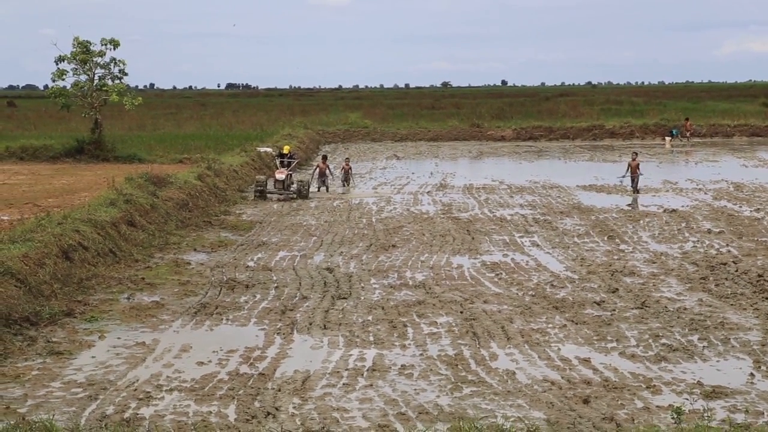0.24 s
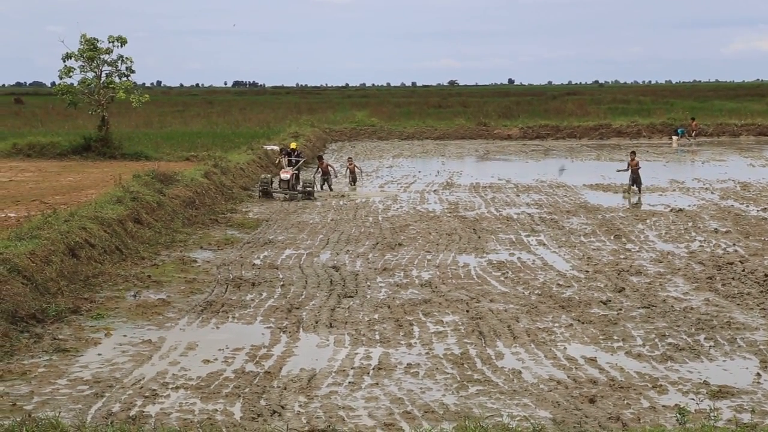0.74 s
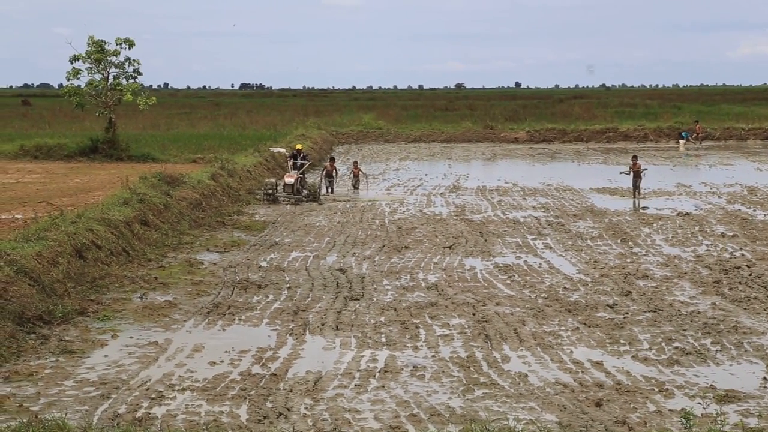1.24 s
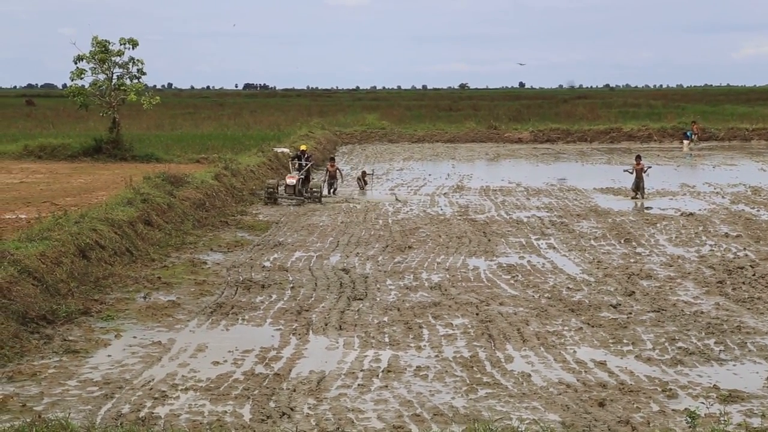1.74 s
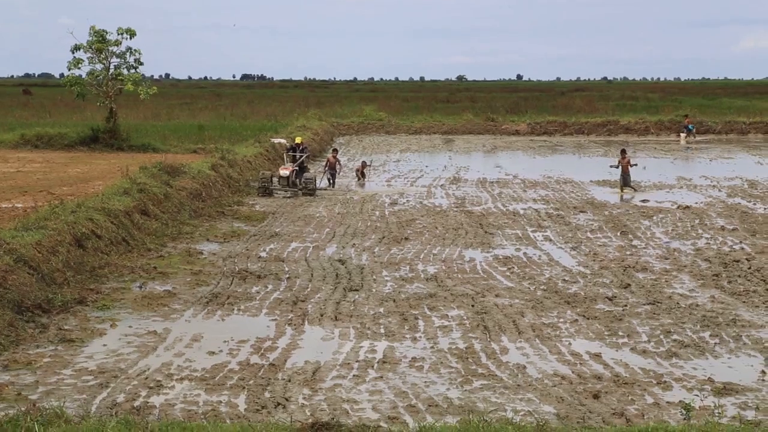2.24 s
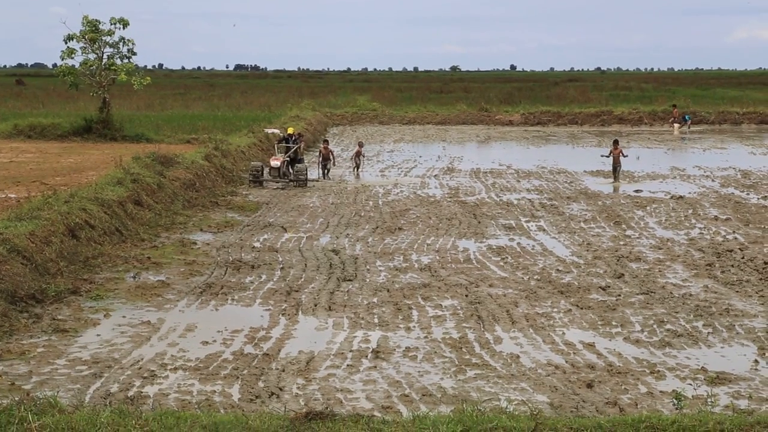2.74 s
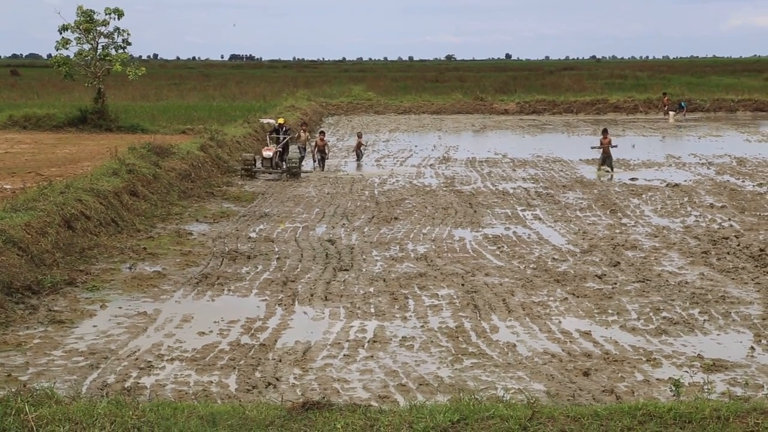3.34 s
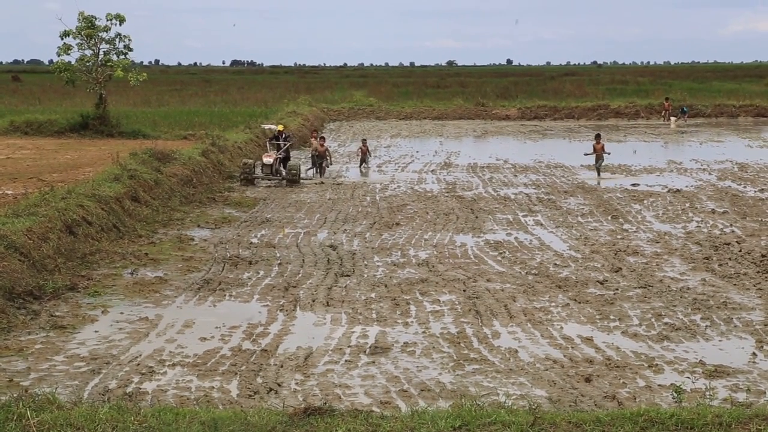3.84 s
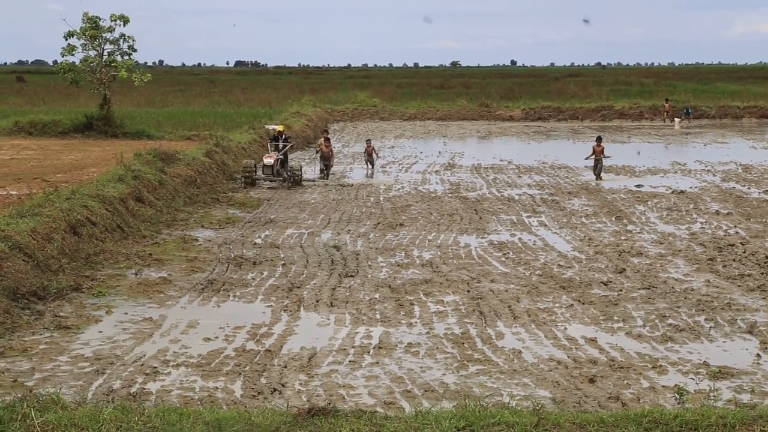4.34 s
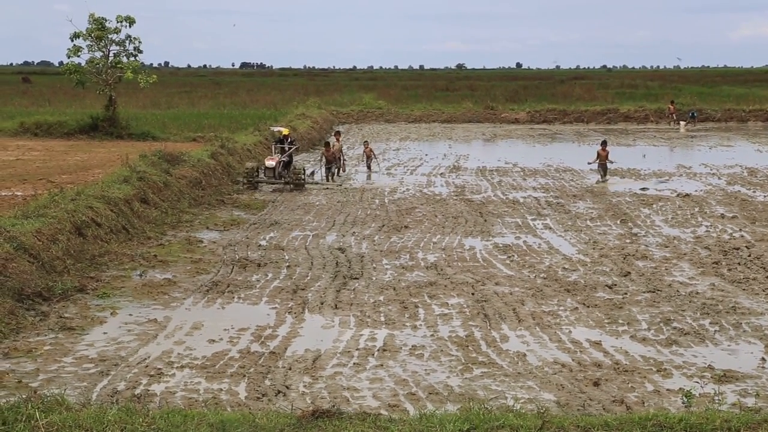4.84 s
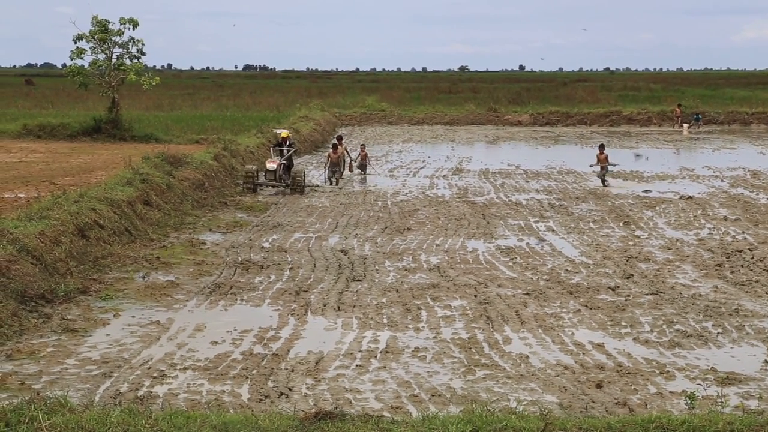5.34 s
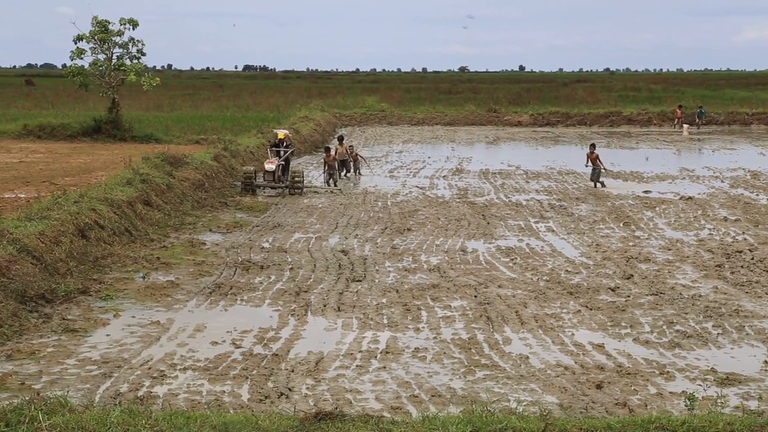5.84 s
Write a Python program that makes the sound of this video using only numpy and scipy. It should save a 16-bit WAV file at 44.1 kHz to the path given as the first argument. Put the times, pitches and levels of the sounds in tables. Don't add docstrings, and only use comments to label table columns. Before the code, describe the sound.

Fast, even putt-putt of a small diesel engine far off over mud and water, repeatedly buried under heavy low wind buffeting on the microphone.

```python
import sys
import numpy as np
from scipy import signal
from scipy.fft import rfft, irfft, next_fast_len
from scipy.io import wavfile
from scipy.ndimage import uniform_filter1d, minimum_filter1d, map_coordinates

SR = 44100
rng = np.random.default_rng(int(sys.argv[2]) if len(sys.argv) > 2 else 0)


def attenuation_scalar(level_db):
    decades = np.asarray(level_db, float) / 20
    return 10 ** decades


def transcribe(u):
    v = np.clip(np.atleast_2d(u).T, -1, 1)
    q = np.round(v * 32767).astype(np.int16)
    wavfile.write(sys.argv[1], SR, q)


N = 269010

# [f/Hz, width/Hz, level/dB]
BLOCK_MODES = [(1300, 2000, -9), (2710, 184, 5), (2900, 74, 7), (3222, 128, 6), (4280, 640, -6)]
# [f/Hz, level/dB per Hz]
BLOCK_TREBLE = [(4000, -2.5), (5500, 0), (6500, -2.5), (8500, -4.5), (9600, -0.5), (10500, -5.5),
                (12000, -9.5), (13000, -26), (15500, -34)]
# [t/s, whine level/dB, engine drone level/dB]
WHINE_DRONE_LEVELS = [(0, -52, -44.5), (.71, -49, -43.5), (1.45, -50, -45.5), (1.67, -52, -46.5), (1.89, -53, -44),
                      (2.11, -51, -42), (2.6, -53, -42.5), (3.39, -49, -42), (3.59, -48, -42), (3.93, -48, -42.5),
                      (4.3, -51, -44), (4.46, -50, -42.5), (4.7, -48, -40.5), (5.1, -49, -42), (5.45, -49, -43),
                      (5.6, -51, -45), (5.92, -50, -43), (6.06, -53, -46.5)]


def unit(x):
    return x / np.sqrt(np.mean(x ** 2) + 1e-20)


def curves(rows):
    s, *cols = np.transpose(rows)
    return [np.interp(np.arange(N) / SR, s, c) for c in cols]


def wobble(rate):
    knots = rng.standard_normal(int(N * rate / SR) + 4)
    return map_coordinates(knots, [np.arange(N) * rate / SR])


def filtered(x, response):
    m = next_fast_len(x.shape[-1] + 8192)
    return irfft(rfft(x, m) * response(np.fft.rfftfreq(m, 1 / SR)), m)[..., :x.shape[-1]]


def colour(points):
    f, db = np.transpose(points)
    return lambda hz: attenuation_scalar(np.interp(np.log(hz + 1), np.log(f), db))


def modes(table):
    def response(f):
        return sum((-1) ** k * attenuation_scalar(db) * 1j * f * width / (hz * hz - f * f + 1j * f * width)
                   for k, (hz, width, db) in enumerate(table))
    return response


def decay(t, t60):
    return attenuation_scalar(-60 * t / t60)


def bell(x):
    return np.exp(-.5 * x ** 2)


def lay(times, shapes, lead):
    start = np.round((np.asarray(times) - lead) * SR).astype(int)
    at = start[:, None] + np.arange(shapes.shape[1])
    keep = (at >= 0) & (at < N)
    return np.bincount(at[keep], shapes[keep], N)


def bursts(times, db, envelope, response, lead, grit_db=2.5, alike=0):
    white = rng.standard_normal((2, len(times), len(envelope)))
    white = np.sqrt(1 - alike) * white + np.sqrt(alike) * white[:, :1]
    ring = filtered(white[0] * attenuation_scalar(grit_db * white[1]) * envelope, response)
    ring = ring / np.sqrt(np.sum(ring ** 2, 1, keepdims=True) / np.sum(envelope ** 2))
    return lay(times, attenuation_scalar(db)[:, None] * ring, lead)


def rush(spectrum, patchy_db):
    z = signal.stft(rng.standard_normal(N + 512), nperseg=512)[2]
    field = uniform_filter1d(rng.standard_normal(z.shape), size=5, axis=0)
    field = uniform_filter1d(field, size=6, axis=1)
    patchy = signal.istft(z * attenuation_scalar(patchy_db * unit(field)), nperseg=512)[1][:N]
    return unit(filtered(patchy, colour(spectrum)))


def engine():
    s, clack_db, treble_db, puff_db = firings()
    sound = clack(s, clack_db, treble_db) + exhaust(s, puff_db) + thump(s, puff_db)
    return sound + drone(s) + valves(s, puff_db)


def firings():
    # [t/s, knock level/dB, brightness of the knock/dB]
    fourths = [(.0008, -28.5, -10), (0.46, -29.5, -7), (0.9225, -31, -3), (1.3852, -34, 1.5),
               (1.8488, -30, -11), (2.312, -28, -8), (2.776, -27, -5), (3.238, -28, -11), (3.7, -28, -6.5),
               (4.159, -29.5, -9.5), (4.6244, -27, -9.5), (5.0912, -28, -13), (5.5563, -29.5, -15),
               (6.012, -30.5, -11)]
    # [t/s, extra level/dB]
    accents = [(0, -10.5), (.69, 1.5), (.81, -2), (1.15, 1.5), (1.62, 1), (1.96, 3.5), (2.08, 3),
               (3.12, 2.5), (3.24, -2), (3.81, 1.5), (3.93, 1), (4.97, 1.5), (5.32, 1.5), (2.31, 3.5),
               (2.54, 3.5), (2.66, -3), (2.89, 4), (3.01, 2), (3.35, 0), (3.7, 2), (4.27, -4.5),
               (4.74, 1.5), (4.86, 3), (5.21, 2), (5.67, -1.5), (5.78, 1.5), (6.01, -4)]
    step = np.arange(4 * len(fourths) - 3) / 4
    s, knock_db, bright_db = (np.interp(step, np.arange(len(fourths)), c) for c in np.transpose(fourths))
    for at, db in accents:
        extra_db = db * (np.arange(len(s)) == np.argmin(abs(s - at)))
        knock_db = knock_db + extra_db
        bright_db = bright_db - .6 * extra_db
    drone_s, _, drone_db = np.transpose(WHINE_DRONE_LEVELS)
    mean_db = drone_db.mean()
    puff_db = mean_db + 12 + 0.53 * (np.interp(s, drone_s, drone_db) - mean_db)
    luck = rng.standard_normal((len(s), 3))
    return s, knock_db + .7 * luck[:, 0], bright_db + 1.2 * luck[:, 1], puff_db + 1.5 * luck[:, 2]


def clack(s, clack_db, treble_db):
    t = np.arange(SR // 10) / SR
    blow = bell((t - .006) / 0.0021) + attenuation_scalar(-2.5 - 60 * t / 0.086) * (t > .006)
    snap = bell((t - .005) / np.where(t < .005, .0014, .0027))
    body = bursts(s, clack_db - 2.0, blow, modes(BLOCK_MODES), lead=.0078)
    return body + bursts(s, clack_db + treble_db, snap, colour(BLOCK_TREBLE), lead=0.0049)


def exhaust(s, puff_db):
    # [f/Hz, width/Hz, level/dB]
    pipe = [(660, 16, 5.5), (951, 34.5, 7.5), (1250, 320, -2), (1484, 220, 2.5), (2000, 220, -1),
            (2900, 510, -2), (5800, 5800, -19), (9000, 3400, -17.5)]
    # [f/Hz, level/dB]
    muffle = [(100, -4.5), (2200, 1.5), (2400, -6.5), (11000, -4.5), (15000, -18)]
    # [f/Hz, level/dB, t60/s]
    shell = [(604, 5, 0.027), (693.5, -11, 0.28), (961, -2, 0.045), (1455, -7, 0.03)]
    s, puff_db = np.append(s, 2 * s[-1] - s[-2]), np.append(puff_db, puff_db[-1])
    t = np.arange(SR // 10) / SR
    hold_s = 0.0056
    gas = (1 - np.exp(-t / 0.00035)) * decay(np.maximum(t - hold_s, 0), 0.096)
    gas += 0.075 * bell((t - .008) / 0.00086)
    puff = bursts(s, puff_db, gas, lambda f: modes(pipe)(f) * colour(muffle)(f),
                  lead=.0315, grit_db=4.0, alike=.08)
    ring = sum(attenuation_scalar(db - 60 * t / t60) * np.sin(2 * np.pi * hz * t) for hz, db, t60 in shell)
    ring = ring * (1 - np.exp(-t / 0.0022))
    return puff + lay(s, attenuation_scalar(puff_db)[:, None] * ring, lead=.033)


def thump(s, puff_db):
    t = np.arange(SR // 10) / SR
    thud = np.cos(2 * np.pi * 67 * (t - .006)) * (1 - np.exp(-t / 0.0046)) * decay(t, 0.22)
    return lay(s, attenuation_scalar(puff_db + 8.5)[:, None] * thud, lead=0.0082)


def drone(s):
    # [f/Hz, level/dB per Hz]
    gears = [(250, -7), (420, -7.5), (560, -10), (696, 1.5), (835, -19), (953, -5), (1120, -9.5),
             (1460, -11), (2280, -16.5), (2800, -15), (3230, -22), (3600, -20), (4600, -28.5), (7000, -61)]
    t = np.arange(SR // 10) / SR
    beat = lay(s, np.ones((len(s), 1)) * decay(t, 0.079), lead=0)
    level_db = curves(WHINE_DRONE_LEVELS)[1] + 4.5 + 5.9 * beat + 1.1 * wobble(60) + 1.46 * wobble(350)
    return attenuation_scalar(level_db) * rush(gears, patchy_db=0.5)


def valves(s, puff_db):
    # [t from the knock/s, level against the exhaust puff/dB]
    gear = [
        (-.031, -19),
        (.025, -18.5),
        (.058, -14),
    ]
    t = np.arange(SR // 50) / SR
    luck = rng.standard_normal((len(s), 2, len(gear)))
    tick = (1 - np.exp(-t / 0.0013)) * decay(t, 0.025)
    body = lambda f: colour(BLOCK_TREBLE)(f) + attenuation_scalar(-19.0) * modes(BLOCK_MODES)(f)
    out = np.zeros(N)
    for k, (at, db) in enumerate(gear):
        tick_s = s + at + .001 * luck[:, 0, k]
        out += bursts(tick_s, puff_db + db + 2 * luck[:, 1, k], tick, body, lead=0)
    return out


def ticks():
    chance = rng.random((260, 2))
    s = chance[:, 0] * N / SR
    drone_db = np.interp(s, np.arange(N) / SR, curves(WHINE_DRONE_LEVELS)[1])
    db = drone_db - 3 - 4.3 * np.log(chance[:, 1] + 0.05)
    t = np.arange(SR // 50) / SR
    body = lambda f: modes(BLOCK_MODES)(f) + attenuation_scalar(-21.0) * colour(BLOCK_TREBLE)(f)
    return bursts(s, db, decay(t, 0.0083), body, lead=0)


def rattles():
    # [t/s, peak level/dB, f/Hz]
    knocks = [(0.053, -31.5, 2810), (0.2573, -26, 1250), (1.665, -33, 1690), (1.7787, -27.5, 2710),
              (2, -26, 2920), (2.219, -29, 3200), (2.106, -25, 3180), (3.865, -24.5, 1120),
              (3.9932, -24, 1490), (4.2053, -25.5, 1300), (4.308, -14, 990), (4.336, -26.5, 2420),
              (4.4024, -33, 3340), (4.4674, -26, 1450), (4.5254, -33, 3900), (4.5451, -32, 3400),
              (4.5785, -35, 3200), (4.9018, -22, 2130), (5.3757, -40, 905), (6.0975, -16.5, 2900)]
    s, db, hz = np.transpose(knocks)
    t = np.arange(SR // 20) / SR

    def body(f):
        metal = 1j * f * 400 / (hz[:, None] ** 2 - f * f + 1j * f * 400)
        return metal + attenuation_scalar(-25) * colour(BLOCK_TREBLE)(f) + attenuation_scalar(-11.0) * modes(BLOCK_MODES)(f)
    return bursts(s, db - 7.5, decay(t, 0.048), body, lead=0)


def spray():
    # [f/Hz, level/dB per Hz]
    water = [(2500, -3), (4500, -3), (6000, -1), (9900, 2.5), (11200, -2.5), (13000, -2), (14700, -16),
             (15400, -12), (15800, -5.5)]
    t = np.arange(N) / SR
    drone_db = curves(WHINE_DRONE_LEVELS)[1]
    surge_db = 1.5 * bell((t - 4.64) / 0.19)
    pulse_db = 1.3 * np.cos(2 * np.pi * (t / .1156 - .1))
    level_db = -54.5 + surge_db + 0.93 * (drone_db - drone_db.mean()) + pulse_db
    return attenuation_scalar(level_db + .6 * wobble(64) + 2.2 * wobble(300)) * rush(water, patchy_db=1.2)


def splats():
    # [t/s, peak level/dB]
    mud = [(0.378, -35), (1.5744, -39), (1.8198, -47), (3.0394, -38), (3.0544, -45), (3.1964, -35),
           (3.4027, -36), (3.5433, -38), (3.6621, -33), (3.7743, -32), (4.122, -37), (4.2103, -40),
           (4.3076, -37), (4.5511, -33), (4.6714, -32), (4.7686, -35), (4.8884, -36), (5.004, -33),
           (5.0254, -35), (5.1123, -31.5), (5.2424, -37), (5.3737, -34), (5.6804, -38), (5.8864, -42),
           (5.9204, -44), (6.0264, -42)]
    s, db = np.transpose(mud)
    t = np.arange(SR // 40) / SR
    wet = (1 - np.exp(-t / 0.0016)) * decay(t, 0.054)
    return bursts(s, db - 6, wet, colour(BLOCK_TREBLE), lead=0.00099)


def wind():
    swirling = eddies()
    moving = swirling + eddy_edges() + wake(swirling) + buffeting(swirling) + heaves()
    return filtered(moving, lambda hz: 1 / (1 + (hz / 1300) ** 4) / (1 + (27 / (hz + 1)) ** 3))


def eddy_rows():
    # [t/s, peak level/dB, f/Hz, length/ms]
    strong = [(0.882, 0.5, 240, 3.2), (1.092, -7, 179, 5.1), (1.109, -5, 205, 6), (1.122, -4.5, 133, 9.5),
              (1.21, -1.5, 198, 2.3), (1.242, -10, 208, 2.8), (1.324, 0, 221, 4.6), (1.357, -3.5, 236, 2.3),
              (1.465, -2, 197, 3.5), (1.475, -0.5, 283, 3.4), (1.488, -3, 290, 5.4),
              (1.603, -1.5, 227, 4.5), (1.964, -2.5, 157, 2.9), (2.345, -12, 170, 8.5),
              (2.595, -6.5, 140, 4.6), (2.644, -4.5, 191, 3.4), (2.669, -6.5, 199, 7),
              (2.913, -9, 162, 6.4), (3.239, 1, 290, 3.8), (3.274, -4.5, 210, 4), (3.582, -10.5, 154, 3.9),
              (3.869, -7, 197, 3), (3.96, -10.5, 193, 4.9), (3.988, -7.5, 201, 3.4),
              (4.036, -8.5, 207, 8.5), (4.055, 0.5, 199, 2.9), (4.065, -2, 195, 2.7), (4.076, -4, 219, 2.4),
              (4.113, -6, 206, 4.1), (4.129, -6, 295, 4.7), (4.198, -6.5, 157, 8.3), (4.256, 0.5, 137, 5.5),
              (4.578, -11.5, 117, 15), (4.727, -8, 167, 3), (4.75, -7, 101, 10), (4.871, -5, 164, 2.6),
              (5.35, -1, 220, 5.1), (5.393, -8.5, 184, 12), (5.413, -10, 131, 8.2), (5.477, -10, 182, 15),
              (5.508, -2.5, 358, 2.5), (5.558, -2.5, 313, 4.3), (5.592, -10, 185, 8.7), (5.625, -7, 288, 9),
              (5.682, -3.5, 218, 2.8), (5.737, -5.5, 260, 2.7), (5.963, -3, 214, 7.2),
              (5.982, -7, 209, 5.2), (5.997, -2.5, 227, 5.6), (6.093, -9.5, 200, 5.2)]
    # [t/s, peak level/dB, f/Hz]
    lesser = [(0.079, -16.5, 134), (0.483, -16.5, 168), (0.67, -16, 106), (0.837, -10.5, 119),
              (0.863, -12.5, 278), (0.899, -16, 194), (0.964, -9, 128), (0.994, -13.5, 160),
              (1.037, -13, 164), (1.056, -26, 168), (1.079, -10, 220), (1.143, -12, 189),
              (1.188, -11.5, 161), (1.273, -10.5, 270), (1.303, -6.5, 238), (1.431, -9, 210),
              (1.451, -8, 168), (1.714, -11, 289), (1.938, -11.5, 268), (1.999, -13.5, 168),
              (2.412, -15, 150), (2.561, -13.5, 162), (2.763, -16.5, 169), (2.846, -13, 209),
              (2.967, -14.5, 149), (3.158, -12, 180), (3.23, -8, 195), (3.258, -25, 187),
              (3.546, -13.5, 167), (3.618, -11, 137), (3.674, -13.5, 152), (3.689, -18.5, 300),
              (3.813, -13, 228), (3.881, -17, 158), (3.9, -14, 178), (4.019, -11, 217), (4.096, -11.5, 176),
              (4.148, -10, 154), (4.267, -19, 118), (4.606, -14.5, 192), (4.703, -13.5, 226),
              (4.843, -11.5, 197), (4.881, -24, 150), (4.991, -14, 250), (5.101, -13, 210),
              (5.229, -12, 165), (5.29, -13, 187), (5.52, -13, 156), (5.539, -11, 252), (5.58, -15, 176),
              (5.643, -19, 365), (5.663, -12, 218), (5.915, -13.5, 232), (6.047, -12, 162),
              (6.067, -14, 149),
              (0.279, -18, 147), (0.347, -17, 120), (0.452, -19.5, 133), (0.46, -18.5, 183),
             (0.495, -13.5, 141), (0.59, -13.5, 105), (0.752, -21, 174), (0.818, -24, 123),
             (0.847, -25, 186), (0.937, -21, 158), (0.98, -13, 251), (1.231, -11, 129), (1.511, -37, 200),
             (1.528, -13.5, 206), (1.648, -13.5, 152), (1.902, -15.5, 170), (2.074, -17, 152),
             (2.209, -16, 150), (2.81, -18, 205), (2.897, -16, 160), (2.926, -16.5, 255), (2.936, -25, 178),
             (2.952, -23, 119), (2.999, -17.5, 212), (3.018, -17.5, 147), (3.209, -15, 137),
             (3.504, -17.5, 149), (3.519, -26, 138), (3.844, -17, 225), (3.91, -29, 151), (3.934, -16, 133),
             (3.971, -27, 155), (4.005, -13.5, 199), (4.085, -9, 158), (4.185, -18, 216),
             (4.216, -12.5, 182), (4.236, -18, 192), (4.28, -33, 125), (4.42, -16, 115),
             (4.679, -16.5, 162), (4.773, -14.5, 148), (4.822, -19, 141), (5.12, -17, 162),
             (5.258, -13, 164), (5.271, -24, 153), (5.309, -17, 168), (5.32, -23, 146), (5.337, -21, 225),
             (5.37, -26, 115), (5.432, -22, 139), (5.462, -14, 170), (5.606, -6, 150), (5.696, -19, 120),
             (5.71, -12, 203), (6.011, -31, 200)]
    s, db, hz = np.transpose(lesser)
    turns = 1.16
    return np.hstack([np.transpose(strong), [s, db, hz, 1000 * turns / hz]])


def eddies():
    s, db, hz, ms = eddy_rows()
    t = np.arange(-SR // 20, SR // 20) / SR
    near_pitch = lambda f: bell(np.log((f + 1) / hz[:, None]) / 0.54)
    ragged = unit(filtered(rng.standard_normal((len(s), len(t))), near_pitch))
    flip = .5 * rng.integers(2, size=(len(s), 1))
    core = bell(t * hz[:, None] / 0.73) * np.cos(2 * np.pi * (hz[:, None] * t + flip))
    swirl = ragged + 2.96 * core
    envelope = bell(t / (0.00052 * ms[:, None])) + 0.048 * bell(t / .014)
    size = np.sqrt(np.sum(envelope ** 2, 1) / np.sum((swirl * envelope) ** 2, 1))
    return lay(s, (attenuation_scalar(db - 4.0) * size)[:, None] * swirl * envelope, lead=1 / 20)


def eddy_edges():
    # [t/s, peak level/dB]
    fronts = [(0.872, -3), (1.088, -15), (1.119, -6), (1.219, -5.5), (1.241, -14), (1.297, -13),
              (1.322, -9), (1.36, -10), (1.473, -14), (.889, -3.5), (5.502, -3.5), (5.514, -10),
              (1.338, -4.5), (1.455, -14), (2.401, -24), (4.05, -12), (3.238, -31), (3.255, -5.5),
              (3.689, -17), (3.981, -10.5), (4.06, -4), (4.129, -9), (5.348, -5), (5.396, -11), (5.59, -18),
              (5.508, -5), (5.558, -24), (5.624, -21), (5.642, -6.5), (5.968, 1.5), (5.981, -4.5),
              (5.991, -2.5), (6.087, -4)]
    # [f/Hz, level/dB per Hz]
    crackle = [(150, 1.5), (380, 1), (600, -4), (900, -16.5), (1600, -25), (3000, -72)]
    t = np.arange(-SR // 20, SR // 20) / SR
    s, db = np.transpose(fronts)
    return bursts(s, db - 2.5, bell(t / 0.0012), colour(crackle), lead=1 / 20, grit_db=23.0)


def wake(swirling):
    # [f/Hz, level/dB per Hz]
    turbulence = [(50, -21), (110, 3.5), (220, -0.5), (400, -8), (700, -21), (1200, -58)]
    near = np.sqrt(abs(uniform_filter1d(swirling ** 2, size=1100)))
    return 0.41 * near * attenuation_scalar(3.7 * wobble(70)) * rush(turbulence, patchy_db=3.0)


def buffeting(swirling):
    # [t/s, level/dB]
    gusts = [(0, -34.5), (.88, -29), (1.2, -24), (1.82, -35), (2, -29.5), (2.43, -36), (2.82, -28.5),
             (3.04, -37), (3.33, -33), (3.65, -31.5), (4.09, -25.5), (4.33, -32.5), (4.74, -29),
             (5.01, -36.5), (5.52, -21.5), (5.83, -34.5), (5.93, -24.5), (6.1, -17)]
    # [f/Hz, level/dB per Hz]
    rumble = [(40, -54), (90, 4.5), (146, 2.5), (338, -12), (510, -16.5), (900, -39), (2000, -88)]
    # [f/Hz, level/dB per Hz]
    deep_rumble = [(15, -45), (30, 1), (55, -1), (85, 1), (130, -2.5), (220, -54)]
    gust_db, = curves(gusts)
    lumps = attenuation_scalar(5.1 * np.tanh(wobble(45)) + 2.56 * wobble(130))
    flutter = attenuation_scalar(gust_db + 0.5) * unit(lumps * rush(rumble, patchy_db=0.5))
    rise_db = 0.9 * np.arange(N) / SR
    deep_db = -36 + rise_db + 0.47 * (gust_db - gust_db.mean()) + 2.4 * wobble(11.0)
    push = np.sqrt(abs(uniform_filter1d(swirling ** 2, size=1800)))
    return flutter + (attenuation_scalar(deep_db) + 0.33 * push) * rush(deep_rumble, patchy_db=2.5)


def heaves():
    # [t/s, peak level/dB, f/Hz]
    swings = [(0.593, -24, 80), (0.679, -17.5, 67), (0.818, -21, 75), (0.873, -25, 76), (0.924, -24, 69),
              (1.122, -8, 73), (1.219, -30, 68), (1.357, -20, 71), (1.482, -17, 70.5), (1.965, -26, 65.4),
              (2.262, -20, 65), (2.346, -25, 64), (2.591, -12.5, 77), (2.668, -21, 74), (2.852, -16, 72),
              (2.957, -18, 66), (3.231, -16, 68), (3.588, -15, 78), (3.876, -25, 78), (3.962, -23, 74),
              (4.064, -4, 77), (4.197, -16, 78), (4.259, -8, 68), (4.574, -23, 64.5), (4.749, -18, 73),
              (4.825, -22, 70), (4.878, -16, 61), (5.342, -20, 74), (5.412, -16, 74), (5.478, -13, 62),
              (5.556, -16, 67), (5.615, -23, 80), (5.686, -23, 81), (5.739, -19, 64.4), (5.955, -11, 59),
              (6.094, -13, 70)]
    s, db, hz = np.transpose(swings)
    turns = np.arange(-SR // 12, SR // 12) / SR * hz[:, None]
    swing = bell(turns / 0.57) * np.cos(2 * np.pi * (turns + rng.random((len(s), 1))))
    return lay(s, attenuation_scalar(db + 0.5)[:, None] * swing, lead=1 / 12)


def bird():
    # [t/s, f/Hz, level/dB]
    chirps = [
        [(2.258, 2740, -54), (2.263, 2830, -48), (2.271, 2900, -37), (2.275, 3570, -38), (2.28, 3670, -37),
         (2.286, 3100, -44)],
        [(2.237, 4650, -52), (2.242, 4850, -50), (2.248, 5000, -56)],
        [(4.467, 5300, -46), (4.47, 4660, -36), (4.473, 4020, -41)],
        [(5.838, 3900, -52), (5.848, 4630, -51), (5.856, 5000, -49), (5.86, 5030, -53)],
        [(5.836, 2980, -47), (5.847, 3730, -47), (5.855, 3950, -48), (5.863, 3950, -50)],
    ]
    t, out = np.arange(N) / SR, np.zeros(N)
    for note in chirps:
        hz, db = curves(note)
        sounding = (t > note[0][0]) * (t < note[-1][0])
        out += attenuation_scalar(db) * np.sin(2 * np.pi * np.cumsum(hz) / SR) * sounding
    return out


def insect():
    # [t/s, level/dB]
    hissing = [(0, -70), (.9, -74), (1.2, -106), (1.9, -98), (2.1, -67), (3.1, -63), (3.3, -79), (3.6, -84)]
    band = [(11500, -40), (12000, 0), (12200, 0), (12700, -40)]
    return attenuation_scalar(curves(hissing)[0]) * rush(band, patchy_db=1.5)


def belt_hum():
    # [t/s, level/dB]
    humming = [(0, -42), (.27, -42), (.4, -92)]
    phase = 2 * np.pi * np.cumsum(405 + 9 * wobble(29)) / SR
    return attenuation_scalar(curves(humming)[0] + 1.8 * wobble(44)) * np.sin(phase)


def whine():
    level = attenuation_scalar(curves(WHINE_DRONE_LEVELS)[0] + .7 * wobble(12))
    return np.sqrt(2) * level * np.sin(2 * np.pi * 15642 * np.arange(N) / SR)


def ducked(x):
    threshold_db, share, release_s = -8, 0.5, 0.12
    over_db = np.maximum(20 * np.log10(abs(x) + 1e-9) - threshold_db, 0)
    held_db = uniform_filter1d(-minimum_filter1d(-over_db, size=3500, origin=1200), size=1500)
    fade = np.exp(-np.arange(SR) / SR / release_s)
    return x * attenuation_scalar(-share * signal.fftconvolve(held_db, fade[None] / fade.sum())[:, :N])


def scene():
    tractor = engine() + ticks() + rattles() + spray() + splats()
    return (tractor + wind() + bird() + insect() + belt_hum() + whine())[None]


def band_limit(x):
    return signal.sosfilt(signal.butter(12, 15800, fs=SR, output="sos"), x)


def record(dry):
    low_cut_hz, top_hz = 30, 15780
    band = filtered(dry, lambda hz: (hz < top_hz) * 1j * hz / (low_cut_hz + 1j * hz))
    limited = np.clip(ducked(band), -1, 1)
    return band_limit(limited)


dry = scene()
out = record(dry)
transcribe(out)
```